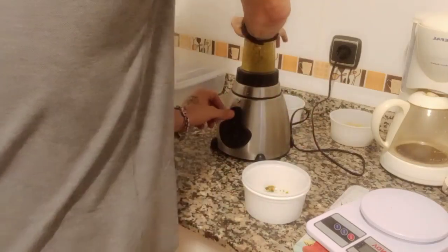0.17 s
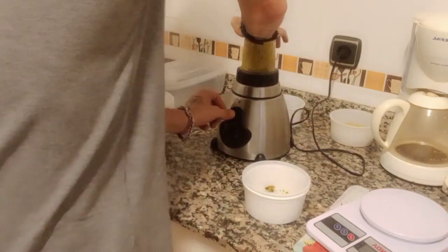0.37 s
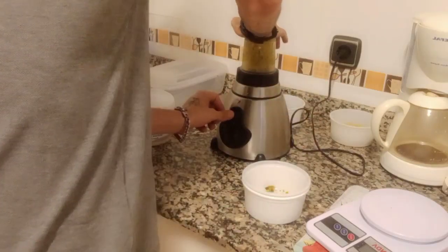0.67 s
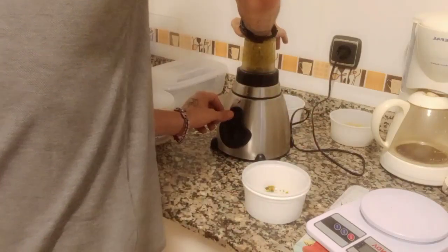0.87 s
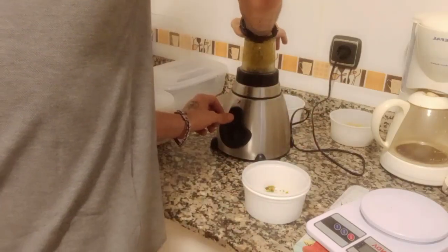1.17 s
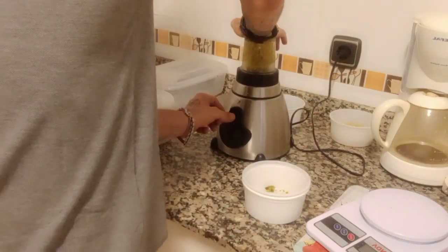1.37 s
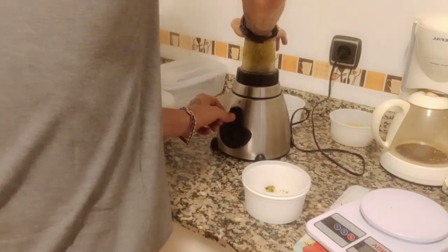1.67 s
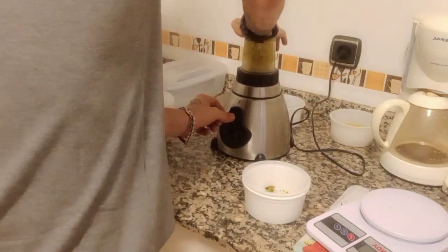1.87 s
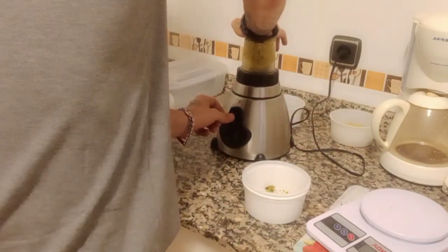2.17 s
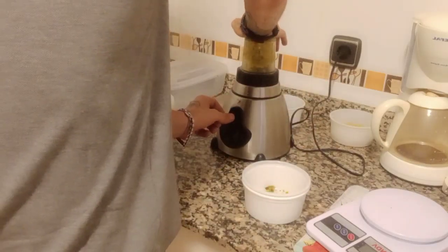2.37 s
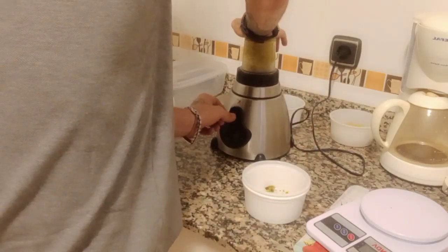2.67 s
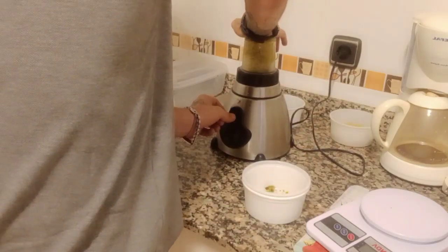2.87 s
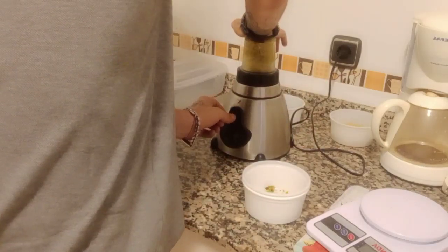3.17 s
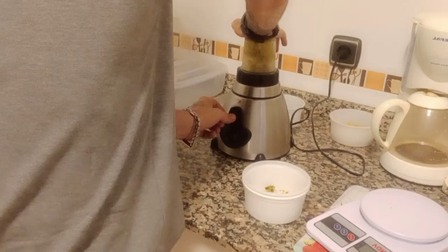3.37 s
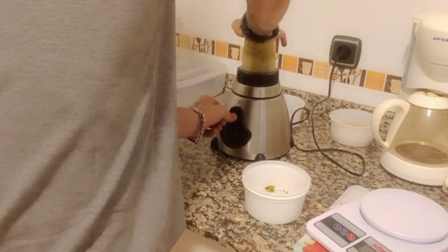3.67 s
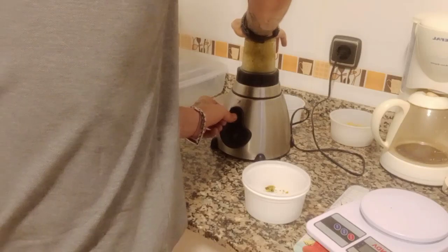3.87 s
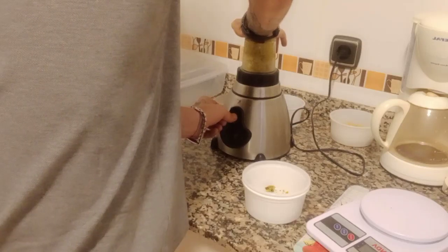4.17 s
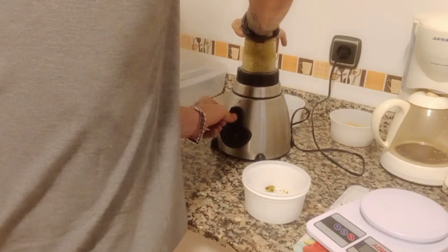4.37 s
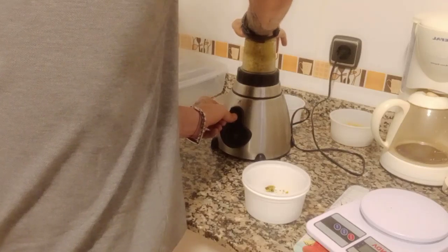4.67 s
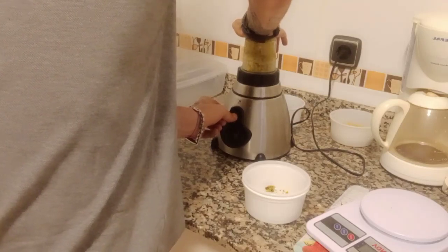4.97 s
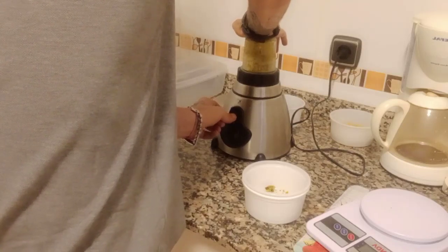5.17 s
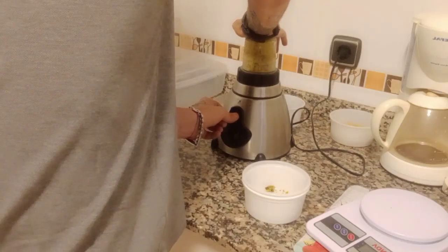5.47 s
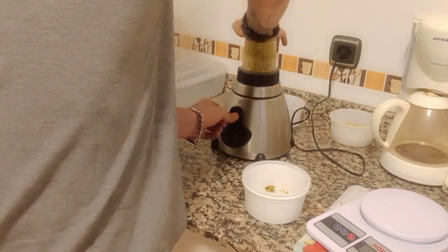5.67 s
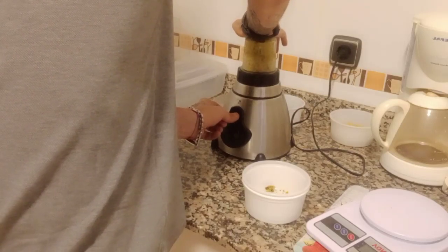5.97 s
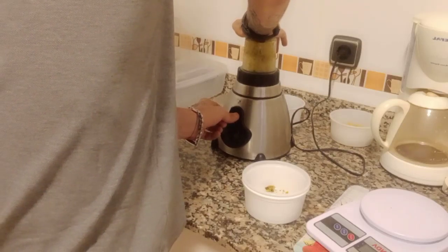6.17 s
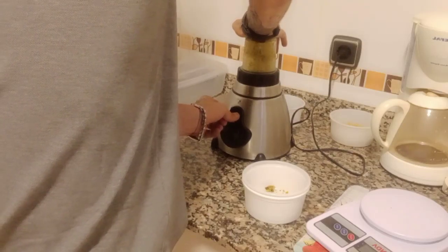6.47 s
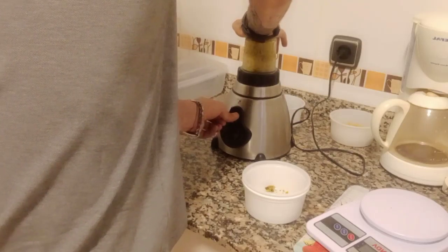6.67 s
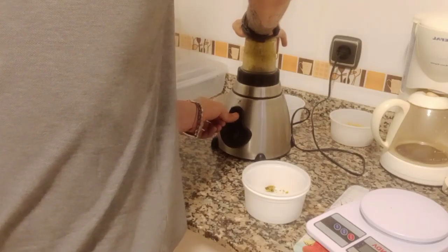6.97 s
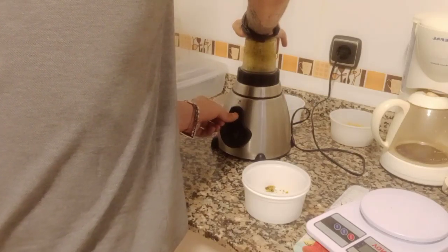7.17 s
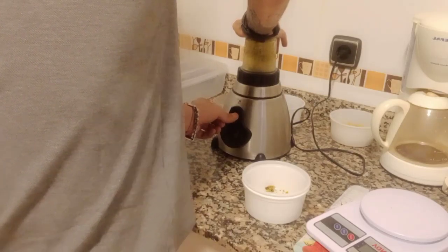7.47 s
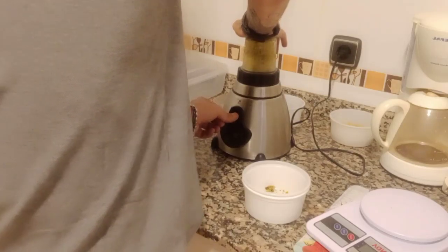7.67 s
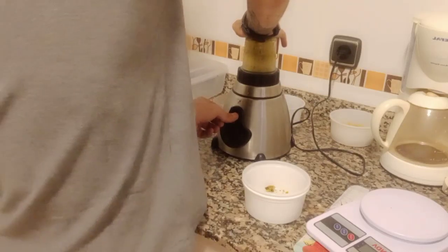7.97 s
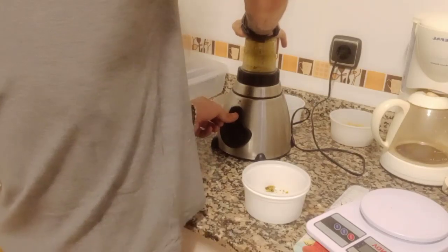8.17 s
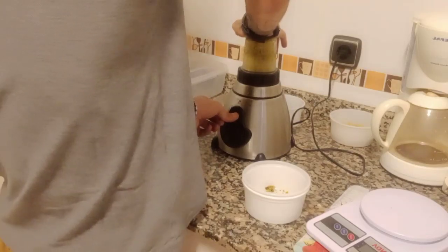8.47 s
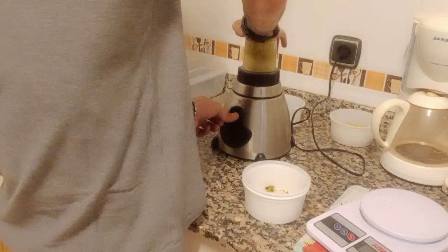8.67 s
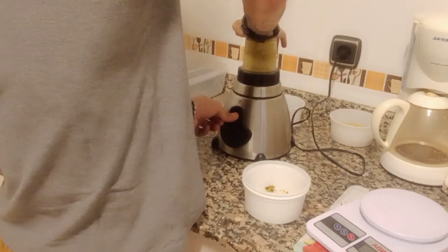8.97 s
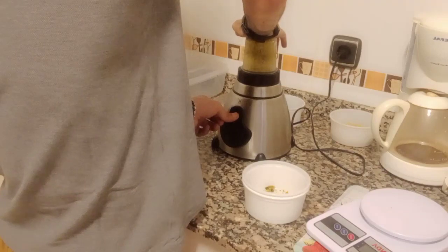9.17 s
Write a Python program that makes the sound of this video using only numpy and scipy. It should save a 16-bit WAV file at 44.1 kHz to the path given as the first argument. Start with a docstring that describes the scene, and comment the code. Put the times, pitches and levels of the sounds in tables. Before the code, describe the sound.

Hard pieces crack and clatter in a small kitchen blender run in six bursts, its motor whirring up and coasting down each time.

```python
"""A faint squeak of a plastic jar under the hand, then a small blender pulsed six times on a stone counter,
about a metre away. The blades shatter hard pieces against the jar and knock the steel base. In the longer
bursts the food is flung clear and the motor spins up to a hum with brush hiss and fan noise, then coasts
down. The tiled kitchen rings on after each burst."""
import sys
import numpy as np
from scipy import signal
from scipy.fft import rfft, irfft
from scipy.io import wavfile
from scipy.ndimage import uniform_filter1d

SR = 44100
rng = np.random.default_rng(int(sys.argv[2]) if len(sys.argv) > 2 else 0)


def digitize_waveform(pressure):
    """Quantize a signal to 16-bit integers and store it at the path in sys.argv[1].

    Rows of a 2-D input are taken as channels; values are limited to [-1, 1].
    """
    field = np.atleast_2d(pressure).T
    bounded = np.clip(field, -1, 1)
    quanta = np.round(bounded * 32767).astype(np.int16)
    wavfile.write(sys.argv[1], SR, quanta)


N = 410571
TIME = np.arange(N) / SR
IR_SAMPLES = 32768
IR_TIME, IR_HZ = TIME[:IR_SAMPLES], np.fft.rfftfreq(IR_SAMPLES, 1 / SR)
LEFT_RIGHT = np.array([[1], [-1]])


def amp(db):
    """Decibels to gain."""
    return 10 ** (np.asarray(db) / 20)


def on_log(points, hz):
    """Read (Hz, value) points on a log-frequency axis."""
    f, value = np.transpose(points)
    return np.interp(np.log(hz + 1), np.log(f), value)


def colour(x, points, band_hz=(20, 16000)):
    """Minimum-phase filter; white input comes out with rms 1 inside the band."""
    gain = amp(on_log(points, IR_HZ))
    gain /= np.sqrt(np.mean(gain ** 2 * (IR_HZ > band_hz[0]) * (IR_HZ < band_hz[1])))
    cepstrum = irfft(np.log(gain))
    cepstrum[1:IR_SAMPLES // 2] *= 2
    cepstrum[IR_SAMPLES // 2:] = 0
    return signal.fftconvolve(x / x.std(), irfft(np.exp(rfft(cepstrum))))[:N]


def resonance(hz, width_hz):
    """Many close modes under one peak; rms 1."""
    tone = irfft(rfft(rng.standard_normal(IR_SAMPLES)) / (1 + (2 * (IR_HZ - hz) / width_hz) ** 4))
    return tone / tone.std()


def impacts(per_s, spread_db):
    """Random clicks, many small and a few large."""
    size = amp(spread_db * np.minimum(rng.exponential(size=N), 5))
    return (rng.random(N) < per_s / SR) * size * rng.choice([-1, 1], N)


def wander(step_s, count):
    """Independent random curves, a new value every step."""
    knots = np.arange(0, N / SR + step_s, step_s)
    return np.array([np.interp(TIME, knots, row) for row in rng.standard_normal((len(knots), count)).T])


# Each row: frequency in Hz, relative level in dB.
ROOM_TONE_SPECTRUM = [(25, -17.5), (60, -5), (200, -3), (320, -8), (500, -11), (1500, -20.5), (3000, -19),
                      (6000, -28), (16000, -38)]

def room_tone(gain_db=-74):
    """Steady, faint, mostly low background noise."""
    return amp(gain_db) * colour(rng.standard_normal(N), ROOM_TONE_SPECTRUM)


# Each row: start in seconds, length in seconds, centre in Hz, width in Hz, level in dB.
SQUEAKS_AND_RUSTLES = [(-0.03, 0.08, 3030, 375, -59), (-0.03, 0.13, 6890, 7000, -69), (1.23, 0.1, 2610, 148.2, -64),
                       (1.368, 0.22, 2970, 300, -60), (6.251, 0.55, 6980, 4900, -74.5)]

def squeaks():
    """Plastic squeaks under the hand in narrow resonances; the wide ones are a faint rustle of hands or cloth."""
    out = np.zeros(N)
    for start_s, length_s, hz, width_hz, db in SQUEAKS_AND_RUSTLES:
        swell = np.sqrt(abs(np.sin(np.pi * np.clip((TIME - start_s) / length_s, 0, 1))))
        out += amp(db) * np.resize(resonance(hz, width_hz), N) * swell
    return out


TOP_SPEED_HZ = 102.78  # pace = shaft speed / top speed
# Each row: switch on, switch off, blades at rest, run-up time constant and bite delay, all in seconds;
# then crack, thump, rattle and brush gains and their change while coasting, all in dB.
PRESSES = [ (0.258, 0.454, 0.95, 0.38, 0.02, -22, -24, -28, -40, 0.1),
           (1.444, 1.656, 2.213, 0.39, 0.032, -26, -27, -31, -29.5, 4.5),
           (2.586, 2.808, 3.304, 0.449, 0.05, -25, -26, -30.5, -29.5, 5),
           (3.663, 5.02, 6.225, 0.38, 0.04, -27.5, -30.5, -27, -28.5, -6),
           (6.582, 7.11, 7.97, 0.364, 0.015, -25.5, -26.5, -27.5, -28, -1.14),
           (8.216, 9.4, 10.2, 0.37, 0.12, -29, -30.5, -28.5, -28.5, 1), ]
CRACK_COL, THUMP_COL, RATTLE_COL, BRUSH_COL = 5, 6, 7, 8

def shaft_speed(leap_s=0.105, slow_share=0.428, drag_s=1.587, friction_hz_per_s=42.1, jam_s=0.376):
    """Turns a second: a leap, a slow climb as food is ground, a coast against drag and friction."""
    speed = np.zeros(N)
    friction_hz = friction_hz_per_s * drag_s
    for on, off, rest, run_up_s, *_ in PRESSES:
        held_s = np.clip(TIME, on, off) - on
        shortfall = (1 - slow_share) * np.exp(-held_s / leap_s) + slow_share * np.exp(-held_s / run_up_s)
        driven_hz = TOP_SPEED_HZ * (1 - shortfall)
        slowed_hz = (driven_hz + friction_hz) * np.exp(-np.maximum(TIME - off, 0) / drag_s) - friction_hz
        jam = np.clip((rest - TIME) / jam_s, 0, 1)  # food stops the blades
        speed += np.maximum(slowed_hz, 0) * jam
    return speed


def coasting(unload_s=0.092):
    """Rises to 1 after the switch is let go; 0 while held or at rest."""
    return sum((TIME < rest) * np.clip((TIME - off) / unload_s, 0, 1) for _, off, rest, *_ in PRESSES)


def load(pace, column, power, clear_pace, clear_db, coast_db, rise_s=0.0023, jolt_pace=0.17, unbitten_db=-5):
    """Gain of one layer: a starting jolt, growth with pace, a drop as the food is flung clear."""
    gain, free = np.zeros(N), coasting()
    for press in PRESSES:
        on, off, rest, _, bite_s = press[:5]
        span = slice(*np.searchsorted(TIME, [on, rest]))
        t = TIME[span]
        db = press[column] + unbitten_db * (t < on + bite_s) + (coast_db + press[-1]) * free[span]
        rise = 1 - np.exp((on - t) / rise_s)
        gain[span] = amp(db) * rise * np.maximum(pace[span], jolt_pace * (t < off)) ** power
    flung = 1 / (1 + np.exp((clear_pace - pace) / 0.074))
    return gain * amp(clear_db * flung)


# Each row: centre in seconds, half length in seconds, crack boost in dB, thump and rattle boost in dB.
FOOD_CLUMPS = [(0.429, 0.046, 3.5, -0.5), (1.956, 0.078, 6, 4), (3.107, 0.059, 1, 0), (3.973, 0.05, 6, 0.5),
               (4.32, 0.082, 8.5, -0.5), (5.963, 0.22, 7.5, 2.5), (6.896, 0.041, 3.5, 2),
               (7.759, 0.15, 4, 2.5), (8.572, 0.054, 5.5, 1.5)]

def clumps():
    """Clumps pass through the blades; returns the gains for cracks and for thumps and rattle."""
    crack_db = knock_db = 0
    for centre_s, half_s, crack_boost_db, knock_boost_db in FOOD_CLUMPS:
        swell = np.exp(-((TIME - centre_s) / half_s) ** 2)
        crack_db += crack_boost_db * swell
        knock_db += knock_boost_db * swell
    return amp(crack_db), amp(knock_db)


# Each row: frequency in Hz, relative level in dB.
CRACK_SPECTRUM = [(300, -11), (900, -0.5), (1300, 1.5), (2300, 2), (3050, 4), (3500, 1), (4800, 0),
                  (6600, -6), (7850, 1), (8700, -2), (9700, -1.5), (11700, -5), (13200, -9), (16000, -12.5)]

def cracks(pace, sweep, gain_db=-1):
    """Pieces shatter in bunches as each blade sweeps by."""
    clicks = impacts(per_s=1300 * sweep, spread_db=4.0)
    gain = load(pace, CRACK_COL, power=0.61, clear_pace=0.78, clear_db=-17, coast_db=-6.5)
    return amp(gain_db) * gain * colour(clicks, CRACK_SPECTRUM, band_hz=(6500, 11000))


# Each row: centre in Hz, width in Hz, relative level in dB, T60 in seconds.
HOUSING_MODES = [(880, 100, -2.5, 0.62), (2650, 180, -9.5, .35), (3030, 330, 2, 0.4), (4060, 130, -21, .3),
                 (6200, 150, 0, 0.45), (7840, 960, -1, 0.46), (9650, 400, -9.5, 0.53)]

def housing_ring(strikes, gain_db=-52):
    """Strikes ring clusters of close modes in the jar and steel housing."""
    response = sum(amp(db + gain_db) * resonance(hz, width_hz) * amp(-60 * IR_TIME / t60_s)
                   for hz, width_hz, db, t60_s in HOUSING_MODES)
    return signal.fftconvolve(strikes, response)[:N]


# Each row: frequency in Hz, relative level in dB.
THUMP_SPECTRUM = [(25, -59), (42, -23.5), (75, -26), (105, -2), (128, -5), (152, 3), (180, -4), (270, 4.5),
                  (400, -13), (800, -25), (2000, -48.5)]

def thumps(pace, sweep, gain_db=-1):
    """Heavy pieces thump the jar and are flung clear first."""
    clicks = impacts(per_s=420 * sweep, spread_db=0.3)
    gain = load(pace, THUMP_COL, power=0.43, clear_pace=0.65, clear_db=-18.5, coast_db=-7.5, rise_s=0.026)
    return amp(gain_db) * gain * colour(clicks, THUMP_SPECTRUM, band_hz=(90, 160))


# Each row: frequency in Hz, relative level in dB.
RATTLE_SPECTRUM = [(40, -60.5), (120, -27.5), (175, -15.5), (205, 10), (275, 7), (325, 0.5), (365, 2.5),
                   (455, -2.5), (550, -10), (700, -2.5), (820, 1.5), (930, -15.5), (1060, -5.5),
                   (1300, -18.5), (3000, -28.5)]

def base_rattle(pace, gain_db=-1):
    """Dense knocks rattle the steel base."""
    clicks = impacts(per_s=1200, spread_db=2.5)
    gain = load(pace, RATTLE_COL, power=0.41, clear_pace=0.86, clear_db=-18.5, coast_db=-3, rise_s=0.012)
    return amp(gain_db) * gain * colour(clicks, RATTLE_SPECTRUM, band_hz=(330, 480))


# Each row: frequency in Hz, relative level in dB.
BRUSH_SPECTRUM = [(1500, -21), (3900, -22), (4750, 2.5), (5250, 0.5), (6200, -12.5), (9000, -14.5),
                  (11000, -14), (12100, -1.5), (13300, -15.5), (16000, -20.5)]

def brush_hiss(turn, brush_load, gain_db=3.5, flutter=0.65):
    """Brushes rub the commutator, fluttering once a turn; loudest under load."""
    rubbing = rng.standard_normal(N) * (1 + flutter * np.cos(turn))
    return amp(gain_db) * brush_load * colour(rubbing, BRUSH_SPECTRUM, band_hz=(4600, 5600))


# Each row: start in seconds, relative level in dB.
JAR_HITS = [(0.3179, -4), (0.4336, -4), (0.4412, -2), (0.5565, -10), (1.543, -8), (1.9847, -16.5),
            (2.677, -4.5), (3.9549, -3.5), (5.256, -19.5), (5.8144, -17), (5.899, -17.5), (6.8771, -4),
            (7.347, -15), (7.5146, -4.5), (7.8108, -11.5), (8.3063, -10), (8.495, -9)]

def hard_hits(gain_db=-5, decay_s=0.0016):
    """Single hard pieces hit the jar, each a short snap of noise."""
    out = np.zeros(N)
    decay = np.exp(-IR_TIME[IR_TIME < 0.02] / decay_s)
    for start_s, db in JAR_HITS:
        start = int(start_s * SR)
        out[start:start + len(decay)] += amp(db + gain_db) * decay * rng.standard_normal(len(decay))
    return out


# Each row: multiple of the shaft rate, relative level in dB.
WHINE_ORDERS = [(1, -44), (2, -36.5), (4, -47.5), (5, -44.5), (7, -23.5), (8, -31.5), (10, -37.5),
                (11, -29), (12, -24.5), (15, -31), (18, -30), (21, -35), (24, -39.5), (27, -38.5),
                (30, -39.5)]
# Each row: frequency in Hz, housing's transmission of the commutator tone in dB.
COMMUTATOR_PATH = [(1500, 2.5), (2100, -10), (2700, -10.5), (3100, -53), (3600, -12)]

def whine(speed, turn, brush_load, shaft_db=-12, commutator_db=-1, coast_db=-5, commutator_order=36):
    """Shaft harmonics, softer with the current off, and the commutator's thin tone under load."""
    shaft = sum(amp(db) * np.sin(order * turn + rng.uniform(0, 2 * np.pi)) for order, db in WHINE_ORDERS)
    shaft *= amp(shaft_db + coast_db * coasting()) * (speed / TOP_SPEED_HZ) ** 2.2
    path_db = on_log(COMMUTATOR_PATH, commutator_order * speed)
    return shaft + amp(commutator_db + path_db) * brush_load * np.sin(commutator_order * turn)


# The kitchen's standing waves. Each row: centre in Hz, half width in Hz, lift or dip in dB.
ROOM_MODES = [(210.2, 3.3, 5.8), (221, 2.5, -6), (245.9, 4.7, 6.9), (256.5, 1.8, -8), (265.3, 8.8, 14),
              (274.3, 1.3, -9), (281.8, 3.3, 9.8), (286.2, 1.1, -7), (291.7, 2.6, 8.3), (302.5, 8.6, 12.5)]
# Each row: frequency in Hz, base's radiation of the hum's overtones in dB.
OVERTONE_RADIATION = [(300, -40), (480, -38.5), (530, -37.5), (570, -30.5), (610, -36), (720, -32.5),
                      (790, -25.5), (880, -29.5), (915, -39.5)]

def hum(speed, turn, gain_db=-26, wobble_db=4, coast_db=-2, overtone_coast_db=-7,
        full_pace=0.82, steady_pace=0.92, left_db=2, left_lead_s=0.00019):
    """Three pushes a turn shake the base; the tone wobbles as food tumbles and glides through room modes."""
    stereo_turn = turn + np.pi * speed * left_lead_s * LEFT_RIGHT
    pace, pitch_hz, free = speed / TOP_SPEED_HZ, 3 * speed, coasting()
    shaking = np.minimum(pace / full_pace, 1) ** 2
    tumbling = np.sqrt(np.clip(2 * (1 - pace / steady_pace), 0, 1))
    swing, slip = wander(0.025, count=2) * tumbling
    lift = amp(sum(db * np.exp(-((pitch_hz - hz) / half_hz) ** 2) for hz, half_hz, db in ROOM_MODES))
    lift = uniform_filter1d(lift, size=600)  # standing waves take time to build
    gain = amp(gain_db + wobble_db * swing + coast_db * free) * shaking * lift
    out = gain * np.sin(3 * stereo_turn + 0.5 * slip)
    for k in (2, 3):
        fade, drift = wander(0.045, count=4).reshape(2, 2, N)  # shorter waves fade at each ear separately
        db = on_log(OVERTONE_RADIATION, k * pitch_hz) + overtone_coast_db * free + 2.5 * fade
        out += shaking * pace ** 2 * amp(db) * np.sin(3 * k * stereo_turn + 0.45 * drift + 0.5 * slip)
    return np.sqrt(2) * out * amp(LEFT_RIGHT * left_db / 2)


# Each row: frequency in Hz, relative level in dB.
FAN_SPECTRUM = [(30, -47), (100, -22), (300, -6.5), (700, 5.5), (1300, -5.5), (2800, -4), (3500, -6.5),
                (5500, -12.5), (7000, -16.5), (15000, -16.5)]

def fan(pace, gain_db=-33):
    """The fan's rush of air grows steeply with speed."""
    return amp(gain_db) * pace ** 6 * colour(rng.standard_normal(N), FAN_SPECTRUM)


# Each row: frequency in Hz, T60 in seconds.
ROOM_DECAY = [(100, 0.31), (300, 0.4), (1000, 0.38), (3000, 0.47), (5000, 0.45), (8000, 0.35),
              (12000, 0.21), (16000, 0.26)]

def reflections(x, early_db=-4, late_db=2.5, early_s=0.018, alike_hz=600):
    """Quick reflections off counter and tiles, then a diffuse tail; bass reaches both ears alike."""
    mid, side = rfft(rng.standard_normal((2, IR_SAMPLES)))
    width = 0.12 + 0.82 * IR_HZ ** 2 / (IR_HZ ** 2 + alike_hz ** 2)
    field = (mid + width * side * LEFT_RIGHT) / np.sqrt(1 + width ** 2)
    response = amp(early_db) * irfft(field) * np.exp(-IR_TIME / early_s) / np.sqrt(early_s)
    bands = np.round(3 * np.log2(np.maximum(IR_HZ, 200))) / 3  # third octaves
    for band in np.unique(bands):
        tau_s = on_log(ROOM_DECAY, 2 ** band) / np.log(1000)
        response += amp(late_db) * irfft(field * (bands == band)) * np.exp(-IR_TIME / tau_s) / np.sqrt(tau_s)
    # many paths even out: every broad band passes at the same gain
    spectrum = rfft(response)
    spectrum /= np.sqrt(uniform_filter1d(abs(spectrum.mean(axis=0)) ** 2, size=60))
    response = irfft(spectrum)[:, :IR_SAMPLES * 3 // 4]
    return signal.oaconvolve(x[None], response, axes=1)[:, :N]


def kitchen(x, treble_direct_db=-9, treble_room_db=-1, bass_direct_db=-4, bass_room_db=-3, split_hz=600):
    """Bass leaves through the base; food swirls round the jar, so treble leaves from shifting places."""
    bass, treble = (signal.sosfilt(signal.butter(3, split_hz, kind, fs=SR, output="sos"), x)
                    for kind in ("low", "high"))
    shares = wander(0.008, count=4)
    shares /= np.linalg.norm(shares, axis=0)
    room = amp(treble_room_db) * sum(reflections(treble * share) for share in shares)
    room += amp(bass_room_db) * reflections(bass)
    return amp(treble_direct_db) * treble + amp(bass_direct_db) * bass + room


def scene(hum_room_db=-17, bunching=0.8):
    """Squeaks and blender in the quiet kitchen, in stereo."""
    background = room_tone()
    speed = shaft_speed()
    pace = speed / TOP_SPEED_HZ
    turn = 2 * np.pi * np.cumsum(speed) / SR  # shaft angle in radians
    sweep = 1 + bunching * np.cos(2 * turn)  # two blades
    crack_swell, knock_swell = clumps()
    brush_load = load(pace, BRUSH_COL, power=1.8, clear_pace=0.93, clear_db=-28, coast_db=-4)
    strikes = crack_swell * cracks(pace, sweep) + hard_hits()
    noise = strikes + housing_ring(strikes)
    noise += knock_swell * (thumps(pace, sweep) + base_rattle(pace))
    noise += brush_hiss(turn, brush_load) + fan(pace)
    tone = hum(speed, turn)
    # the room holds the earlier pitch, so the gliding hum beats against its echo
    echo = reflections(amp(hum_room_db) * tone[0] + whine(speed, turn, brush_load) + squeaks() + background)
    return kitchen(noise) + tone + echo


def record(dry, top_hz=15850):
    """Steep low-pass on the top treble."""
    return signal.sosfilt(signal.ellip(12, 0.1, 80, top_hz, fs=SR, output="sos"), dry)


dry = scene()
out = record(dry)
digitize_waveform(out)
```